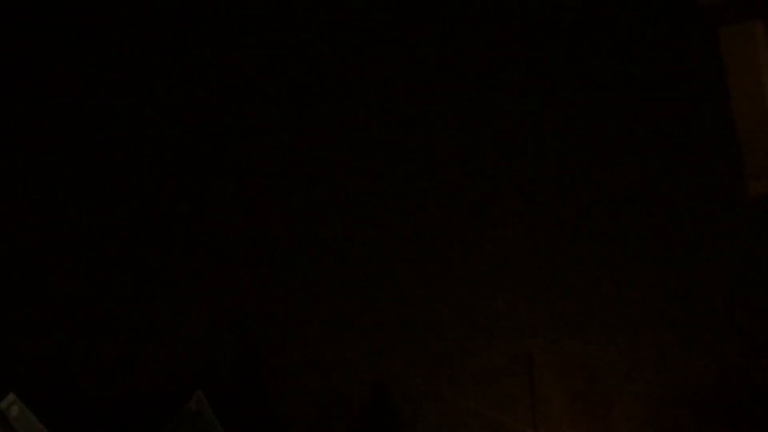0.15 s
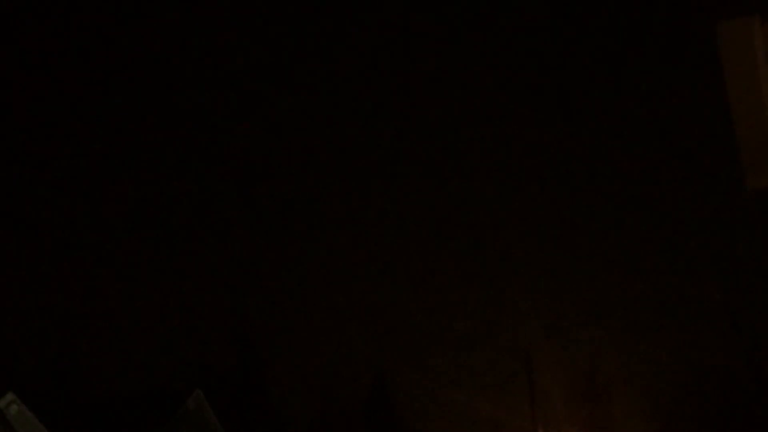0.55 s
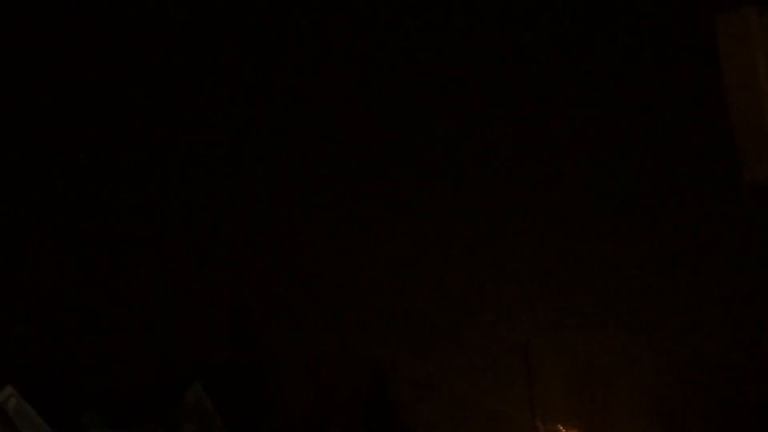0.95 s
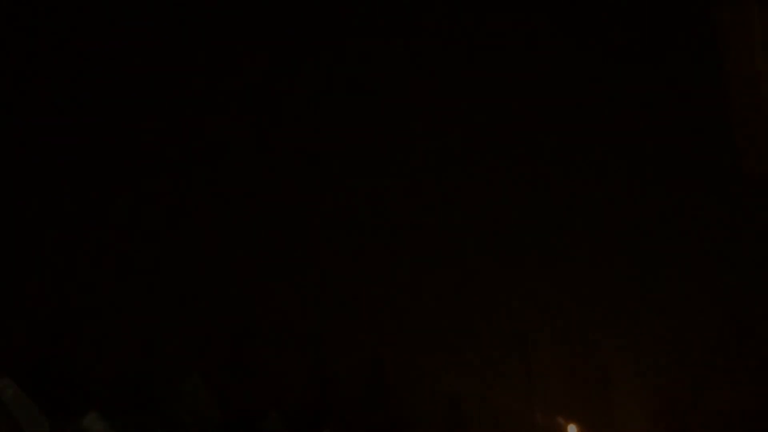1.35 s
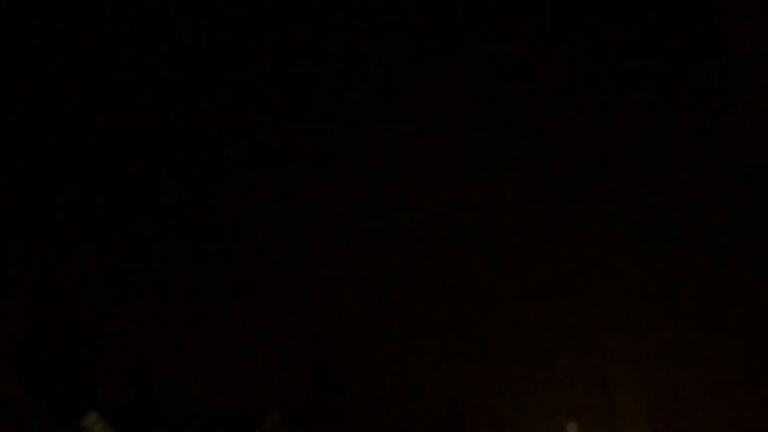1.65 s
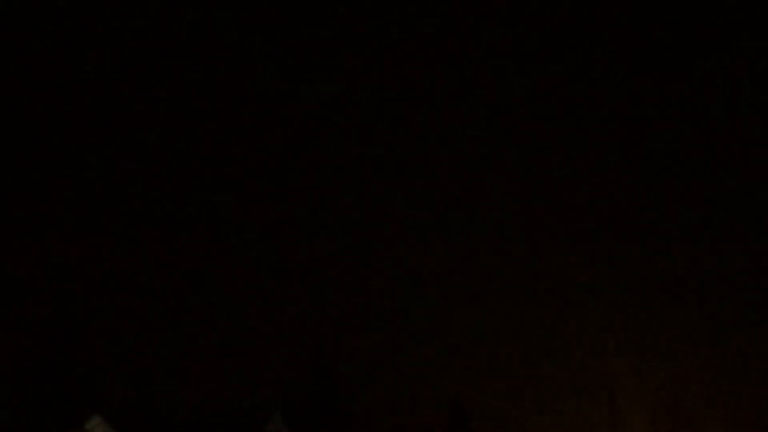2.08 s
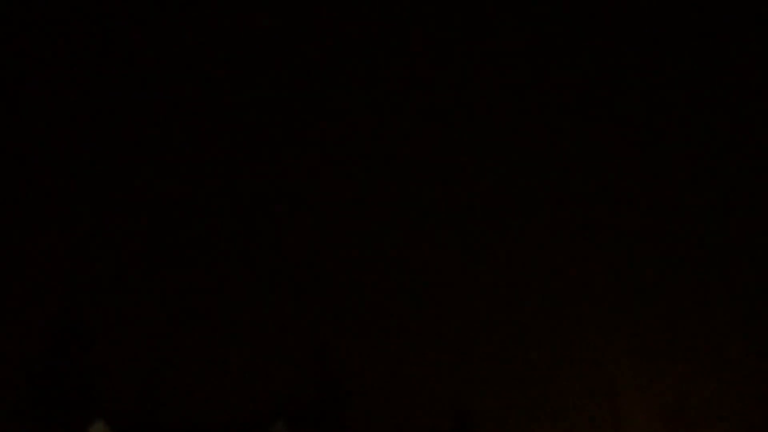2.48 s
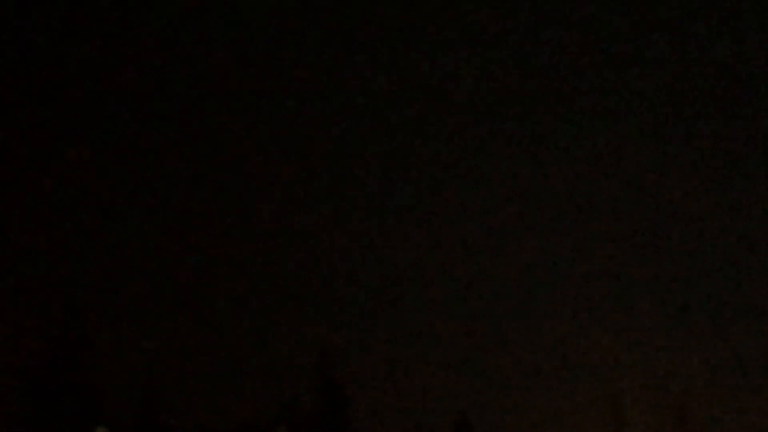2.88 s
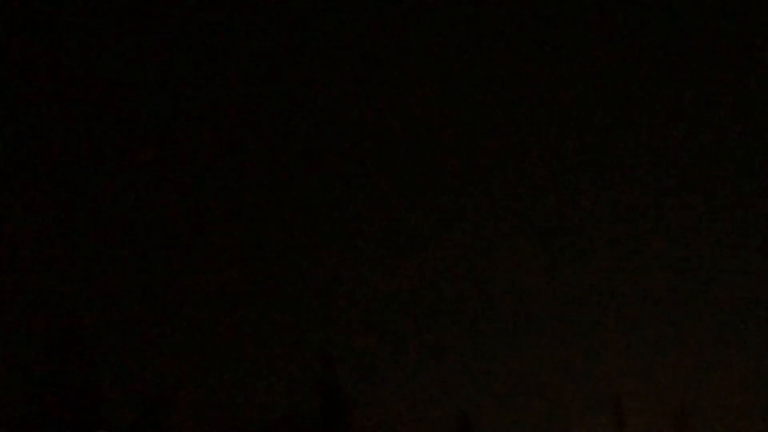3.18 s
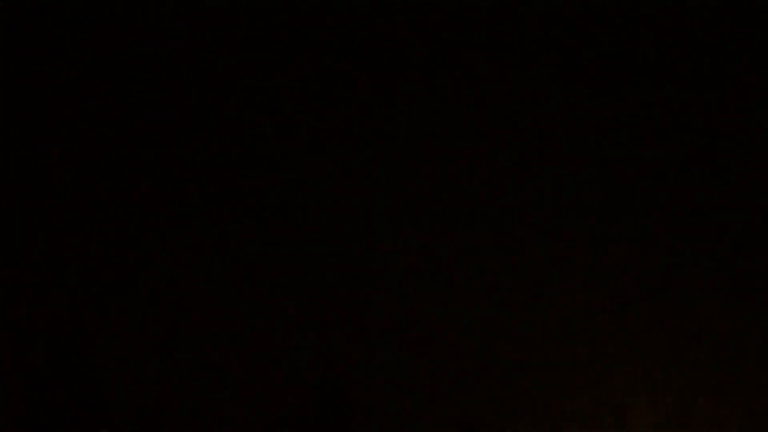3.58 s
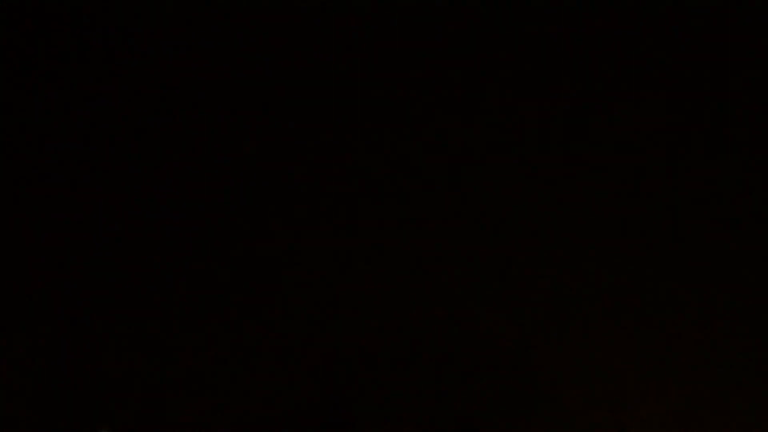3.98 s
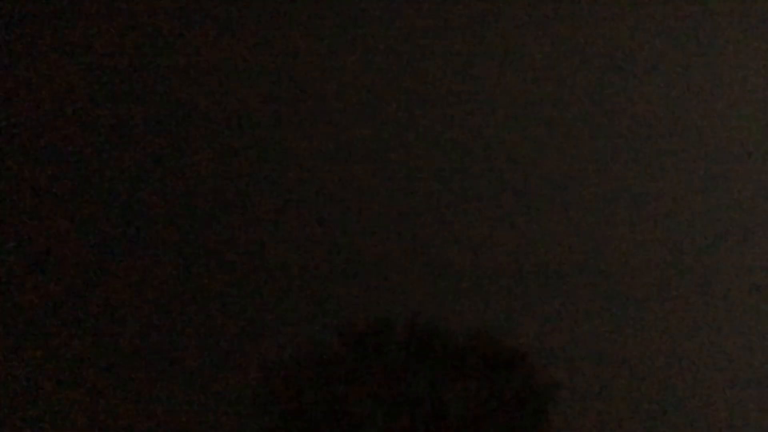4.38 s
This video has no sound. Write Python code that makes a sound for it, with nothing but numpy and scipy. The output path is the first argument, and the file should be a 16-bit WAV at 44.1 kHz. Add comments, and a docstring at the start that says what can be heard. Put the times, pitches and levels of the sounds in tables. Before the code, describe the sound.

Steady rain outdoors at night, heard through a small stereo recorder: a quiet, slightly patchy distant hiss, fine patter all around, and occasional crisp, very short drops close by throughout. A very faint low thunder mutter stirs from about 0.6 seconds and swells a little near 1.0. At 1.6 thunder breaks abruptly, a cluster of deep, blunt knocks and rumble until about 1.95. It sags, then hits again at 2.3 and surges from 2.5 to 3.05, the loudest and densest stretch, with overlapping booms and a muffled, rough crackle. The rumble drops off, with a weaker bump at 3.3, fresh thuds around 3.5 to 3.6 and a deep boom at 3.9, and smaller knocks near 4.1. After that only low rolling echoes fade beneath the rain. The thunder is mostly bass and low-mid, broad but near centre, its peaks flattened by limiting. Rain drops spread wider and become clear again at the end.

```python
"""Thunder over steady night rain, heard outdoors through a small stereo recorder.
A distant mutter comes first; then each stretch of a lightning channel sends a volley of shock waves,
built from dense random clicks in bands, and weaker clicks make the echoes that roll on.
Close to the microphones, bursts of filtered noise tick as single drops; small drops patter all round,
and patchy noise makes the hiss of distant rain. A limiter holds the claps down."""
import sys
import numpy as np
from scipy import signal
from scipy.fft import rfft, irfft
from scipy.io import wavfile
from scipy.ndimage import uniform_filter1d, minimum_filter1d

SR = 44100
rng = np.random.default_rng(int(sys.argv[2]) if len(sys.argv) > 2 else 0)


def bounce(signal):
    """Save signal as a 16-bit WAV file at the path given by the first command-line argument."""
    frames = np.transpose(np.atleast_2d(signal))
    limited = np.clip(frames, -1, 1)
    pcm = np.round(limited * 32767).astype(np.int16)
    wavfile.write(sys.argv[1], SR, pcm)


N = 200073
TIME = np.arange(N) / SR

# likeness of the thunder at the two microphones: (f/Hz, correlation)
THUNDER_LIKENESS = [(60, 0.94), (130, 0.91), (300, 0.9), (700, 0.86), (1400, 0.79), (4000, 0.53)]
# the lowest rumble leans slightly right, the higher part slightly left: (f/Hz, left minus right level/dB)
THUNDER_BALANCE = [(30, -1.5), (60, -.6), (125, .2), (260, 1.8), (600, 1.8), (2500, 1.2)]


def thunder():
    """Direct shocks and their echoes across the stereo field: lowest rumble slightly right, the rest left."""
    return stereo(claps() + roll(), THUNDER_LIKENESS, THUNDER_BALANCE)


# one volley of shocks a row, levels before the limiter:
# (t/s, length before the fade t/s, boom level/dB, body level/dB, crack level/dB, ring f/Hz)
VOLLEYS = [(.96, .1, -53, -46.5, -59.5, 268), (1.219, .015, -60, -54, -56, 330),
           (1.601, 0.011, -31, -33, -43.5, 123), (1.657, .044, -26.5, -27.5, -41, 317),
           (1.71, 0.033, -28, -27.5, -35, 265), (1.833, .006, -34, -31.5, -49, 135),
           (1.894, .004, -41, -30, -44, 188), (1.942, 0.0052, -44, -31, -48, 192),
           (2.329, 0.034, -26, -29, -45, 66.4), (2.5, .054, -23.5, -21, -35, 185),
           (2.563, 0.066, -30.5, -25.5, -40, 264), (2.628, 0.027, -26.5, -19, -36, 288),
           (2.769, 0.028, -45, -30.5, -50, 220), (2.801, 0.047, -28, -21.5, -33.5, 126),
           (2.844, 0.067, -29.5, -23.5, -37, 159), (2.926, 0.044, -32, -20.5, -34, 171),
           (2.985, 0.035, -39, -23, -39, 164), (3.03, 0.036, -27.5, -26, -39, 114),
           (3.296, 0.012, -42, -34, -46, 223), (3.517, 0.046, -37, -32.5, -54, 230),
           (3.606, 0.043, -27, -26.5, -44.5, 145), (3.821, .021, -40, -44, -48, 387),
           (3.872, 0.03, -23, -31, -45.5, 109), (3.935, 0.031, -31, -34.5, -44, 157),
           (4.046, 0.02, -35, -46, -62, 200), (4.118, 0.034, -30.5, -32.5, -49.5, 178)]
# spectrum of the shocks, before the bands are levelled: (f/Hz, level/dB per Hz)
CLAP_COLOUR = [(10, -43), (22, -10), (42, -5.5), (68, 1.5), (100, -2), (165, 1), (235, -4), (280, -3),
               (430, -13), (680, -18.5), (1150, -26), (1500, -32), (2600, -41), (5000, -51), (9000, -112)]
BOOM_TOP_HZ, BODY_TOP_HZ, CRACK_TOP_HZ = 130, 420, 1700
FRONT_S = .002


def claps(shocks_per_s=2000, spread_db=3.5, lead_db=3, lead_s=0.0015, t60=0.089, steady_s=0.022,
          tear_at_db=-37, tear_slope=0.45, size=16384):
    """Kinks of the channel at nearly equal distance arrive as one volley; air and ground round off each shock."""
    out = np.zeros((2, N))
    t = (np.arange(size) - size // 4) / SR  # zero at the arrival
    for s, length, boom_db, body_db, crack_db, ring_hz in VOLLEYS:
        shocks = coloured(clicks(size, shocks_per_s, spread_db), CLAP_COLOUR)
        low, high = split(ringing(shocks, ring_hz), BODY_TOP_HZ)
        boom, body = split(low, BOOM_TOP_HZ)
        crack, tear = split(high, CRACK_TOP_HZ)
        # stronger shocks keep steeper fronts, so they tear more
        crack = crack + amp(tear_slope * (crack_db - tear_at_db)) * tear
        # the first shock of a volley is its hardest
        lead = lead_db * np.exp(-abs(t) / lead_s)
        bands = [(boom_db, boom), (body_db + lead, body), (crack_db + 2 * lead, crack)]
        volley = sum(amp(db) * steadied(band, steady_s) for db, band in bands)
        front = np.sin(np.pi / 2 * np.clip(t / FRONT_S + .5, 0, 1)) ** 2
        fade = amp(-60 * np.maximum(t - length, 0) / t60)
        add(out, s + t[0], volley * front * fade)
    return out


# each peal sets off a roll of echoes from clouds and ground; near-echo levels before the limiter:
# (t/s, rumble level/dB, crack level/dB)
PEALS = [(.62, -58.5, -57.5), (.92, -47, -54), (1.603, -28, -36), (2.29, -37, -46.5), (2.5, -30, -41),
         (2.81, -34, -44.5), (3.58, -41.5, -50.5), (3.89, -45.5, -53), (4.14, -43, -54.5)]
# the storm mutters on in the distance: (rumble level/dB, crack level/dB)
MUTTER_DB = (-66, -66.5)
# spectrum of the echoes, before the bands are levelled: (f/Hz, level/dB per Hz)
ROLL_COLOUR = [(10, -50), (22, -2), (45, -14), (75, -1.5), (130, -2), (190, 0), (300, -3), (430, -7.5),
               (680, -15), (1150, -20), (1600, -25.5), (2600, -36.5), (6000, -84.5)]


def roll(echoes_per_s=3500, spread_db=2.5, steady_s=0.037):
    """Countless weaker shocks, scattered over long paths, fill the time between the claps."""
    starts, *levels_db = np.transpose(PEALS)
    roll_powers = np.array([rolling(TIME - s) for s in starts])
    echoes = coloured(clicks(N, echoes_per_s, spread_db), ROLL_COLOUR)
    out = np.zeros((2, N))
    for db, mutter_db, band in zip(levels_db, MUTTER_DB, split(echoes, BODY_TOP_HZ)):
        power = amp(db) ** 2 @ roll_powers + amp(mutter_db) ** 2
        out += np.sqrt(power) * steadied(band, steady_s)
    return out


# a roll swells, drops quickly as the near echoes pass, then lingers in the far ones
SWELL_S, NEAR_DB_PER_S, FAR_DB, FAR_DB_PER_S = 0.066, 37, -5, 9.5


def rolling(t):
    """Power of one roll of echoes, t seconds after its peal."""
    t = np.maximum(t, 0)
    swell = np.minimum(t / SWELL_S, 1)
    since = np.maximum(t - SWELL_S, 0)
    near = amp(-NEAR_DB_PER_S * since)
    far = amp(FAR_DB - FAR_DB_PER_S * since)
    return swell ** 2 * (near ** 2 + far ** 2)


# the nearest drops, levels before the common trim: (t/s, level/dB, centre f/Hz)
DROPS = [(.041, -46, 9000), (.493, -38, 10800), (.564, -43.5, 11000), (.623, -48, 8500), (0.92, -47, 4500),
         (1.172, -47, 3420), (1.584, -48, 4930), (1.963, -46, 9000), (2.017, -45.5, 6960),
         (2.268, -45, 10000), (2.32, -46, 10900), (2.647, -44, 6800), (2.664, -41, 6500),
         (3.063, -45, 9000), (3.205, -42.5, 7850), (3.241, -45.5, 6400), (3.262, -45.5, 6500),
         (3.331, -42.5, 11000), (3.443, -45, 10000), (3.545, -44, 11000), (3.556, -43, 7000),
         (3.893, -47, 6000), (4.128, -46, 10000), (4.176, -44, 10000), (4.351, -40.5, 7750),
         (4.493, -41, 12000)]
# likeness of all the rain at the two microphones: (f/Hz, correlation)
RAIN_LIKENESS = [(60, 0.88), (300, 1), (700, 0.91), (1400, 0.79), (3100, 0.74), (6800, 0.47), (15000, .3)]
# bigger drops sound lower and splatter longer: t60 at the reference pitch, and its growth as the pitch falls
DROP_T60_S, DROP_GROWTH, DROP_REFERENCE_HZ = 0.011, 2.5, 10000


def drips(trim_db=-4, width=0.39):
    """The nearest drops tick or splatter one by one."""
    out = np.zeros((2, N))
    for s, db, hz in DROPS:
        t60 = DROP_T60_S * (DROP_REFERENCE_HZ / hz) ** DROP_GROWTH
        add(out, s, amp(db + trim_db) * splash(hz, t60, width=width))
    return stereo(out, RAIN_LIKENESS)


def splash(hz, t60, width=.45, slap_db=0, slap_s=0.00022, size=4096):
    """One drop: a sharp slap and a dying spray, centred on a pitch; width in octaves."""
    t, f = np.arange(size) / SR, np.fft.rfftfreq(size, 1 / SR)
    shape = np.exp(-.5 * (np.log2((f + 1) / hz) / width) ** 2)
    spray = evened(irfft(rfft(rng.standard_normal((2, size))) * shape))
    dying = amp(-60 * t / t60)
    slap = amp(slap_db) * np.exp(-t / slap_s)
    return spray * (dying + slap)


# colouring of the small drops nearby: (f/Hz, level/dB)
PATTER_COLOUR = [(300, -43), (1500, -6.5), (4000, -2), (8000, -1), (12000, -2.5), (16000, -8)]


def patter(drops_per_s=500, spread_db=3.0, level_db=-61, base_t60=0.01, count=24):
    """Small drops land on leaves and ground all round; each spot has its own pitch."""
    out = np.zeros((2, N))
    for hz in np.geomspace(2200, 13000, count):
        hits = clicks(N, drops_per_s / count, spread_db)[:1]
        # each spot rings for its own time, from two thirds to 2.6 times the base decay
        drop = splash(hz, base_t60 * rng.uniform(0.67, 2.6), width=0.61)
        out += signal.oaconvolve(hits, drop, axes=1)[:, :N]
    return amp(level_db) * stereo(evened(coloured(out, PATTER_COLOUR)), RAIN_LIKENESS)


# colouring of the distant wash of rain: (f/Hz, level/dB per Hz)
WASH_COLOUR = [(12, 0), (22, 8.5), (60, 14), (130, 3), (330, 1.5), (650, 6.5), (1100, 3), (2200, 1),
               (4300, -0.5), (5500, -4), (6500, -2.5), (8500, -6), (11500, -8.5), (15800, -15)]


def wash(level_db=-52.67, patchy_db=1.08):
    """Distant rain merges into a hiss with small drifting patches."""
    _, _, z = signal.stft(rng.standard_normal((2, N)), SR, nperseg=512)
    patches = rng.standard_normal(z.shape[1:])
    patches = uniform_filter1d(patches, size=14, axis=0)  # across frequency
    patches = evened(uniform_filter1d(patches, size=6, axis=1))  # along time
    hiss = signal.istft(z * amp(patchy_db * patches), SR, nperseg=512)[1][:, :N]
    return amp(level_db) * stereo(evened(coloured(hiss, WASH_COLOUR)), RAIN_LIKENESS)


def clicks(size, per_s, spread_db):
    """Two trains of random clicks of either sign, a few much larger than the rest."""
    sizes = amp(spread_db * np.minimum(rng.exponential(1, (2, size)), 4))
    signs = rng.choice([-1, 1], (2, size))
    return sizes * signs * (rng.random((2, size)) < per_s / SR)


def coloured(x, colour, size=8192):
    """Causal filter: each click becomes a pulse with this spectrum."""
    log_gain = np.log(amp(read(colour, abs(np.fft.fftfreq(size, 1 / SR)))))
    # minimum phase: the phase follows from the log gain
    pulse = np.fft.ifft(np.exp(np.conj(signal.hilbert(log_gain)))).real[:size // 2]
    return signal.fftconvolve(x, pulse[None], axes=1)[:, :x.shape[1]]


def ringing(x, hz, q=6, ring_db=5):
    """A resonance stresses one pitch, as evenly spaced shocks would."""
    b, a = signal.iirpeak(hz, max(q, 1), fs=SR)
    return x + amp(ring_db) * signal.lfilter(b, a, x)


def split(x, hz, order=8):
    """The parts of x below and above a frequency."""
    f = np.fft.rfftfreq(x.shape[1], 1 / SR)
    low = irfft(rfft(x) / (1 + (f / hz) ** order), x.shape[1])
    return low, x - low


def steadied(x, seconds):
    """Holds the running rms near 1."""
    size = max(int(seconds * SR), 2)
    power = uniform_filter1d(uniform_filter1d(x ** 2, size), size)
    return x / np.sqrt(abs(power) + 1e-20)


def stereo(pair, likeness, balance=((1, 0),)):
    """Turns two unrelated signals into left and right with a given likeness and balance by frequency."""
    hz = np.fft.rfftfreq(pair.shape[1], 1 / SR)
    same = np.clip(read(likeness, hz), 0, 1)
    lean = amp(read(balance, hz) / 2)
    mid, side = rfft(pair)
    side = side * np.sqrt((1 - same) / (1 + same))
    return irfft(np.array([(mid + side) * lean, (mid - side) / lean]), pair.shape[1])


def amp(db):
    """Decibels to gain."""
    return 10 ** (np.asarray(db) / 20)


def evened(x):
    """Scales to rms 1."""
    return x / np.sqrt(np.mean(x ** 2) + 1e-20)


def read(points, hz):
    """Reads a table on a log-frequency axis."""
    f, value = np.transpose(points)
    return np.interp(np.log(hz + 1), np.log(f + 1), value)


def add(mix, s, sound):
    """Mixes a stereo sound in at time s."""
    part = mix[:, max(round(s * SR), 0):][:, :sound.shape[1]]
    part += sound[:, :part.shape[1]]


def scene():
    """Thunder over the place, drops close by, rain all around."""
    return thunder() + drips() + patter() + wash()


def record(dry, ceiling_db=-12.0, hold_s=0.018, edge_hz=15850):
    """A fast limiter ducks everything under the largest peaks; then a low-pass sets the band limit."""
    size = max(int(hold_s * SR), 2)
    allowed = np.minimum(1, amp(ceiling_db) / (abs(dry).max(0) + 1e-9))
    limited = dry * uniform_filter1d(minimum_filter1d(allowed, size), size)
    lowpass = signal.firwin(801, edge_hz, window=("kaiser", 9), fs=SR)
    return signal.oaconvolve(limited, lowpass[None], "same")


dry = scene()
out = record(dry)
bounce(out)
```